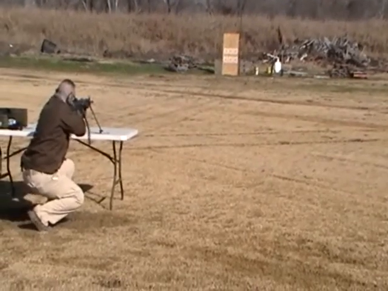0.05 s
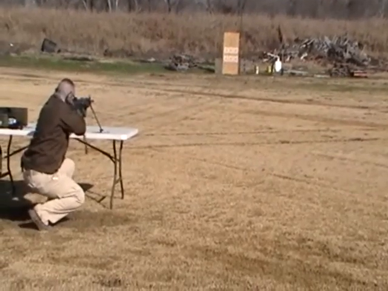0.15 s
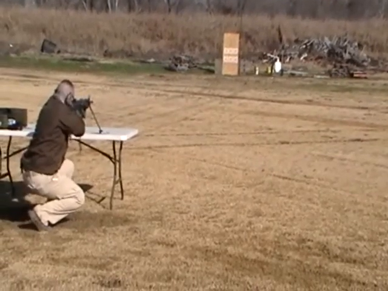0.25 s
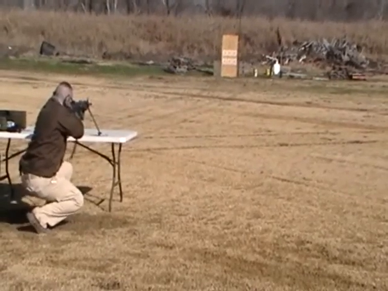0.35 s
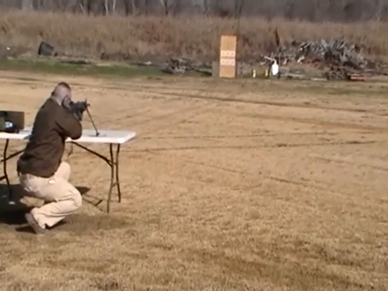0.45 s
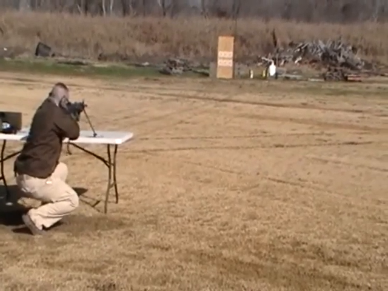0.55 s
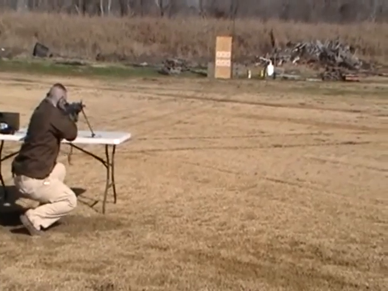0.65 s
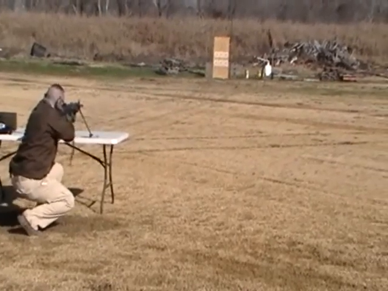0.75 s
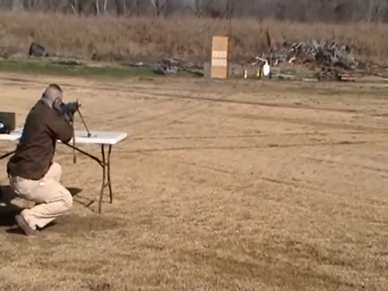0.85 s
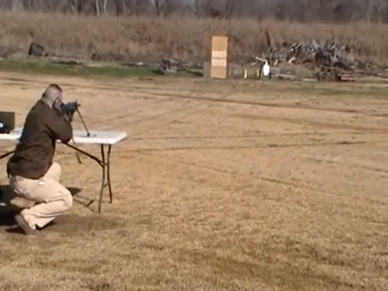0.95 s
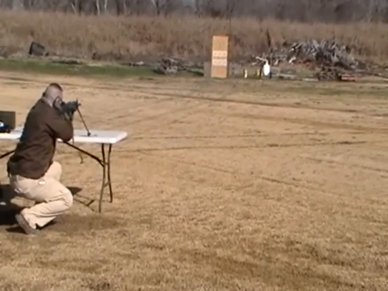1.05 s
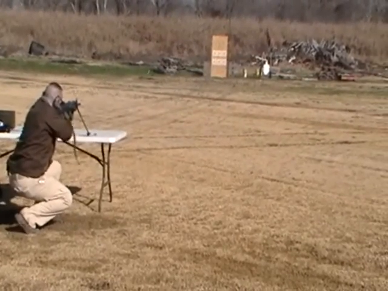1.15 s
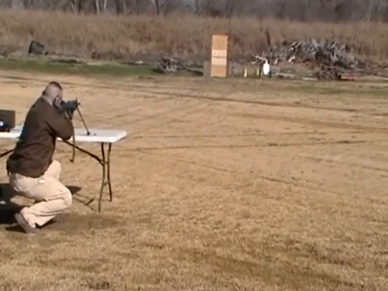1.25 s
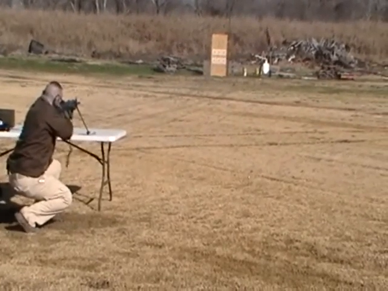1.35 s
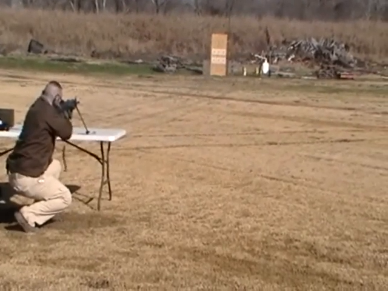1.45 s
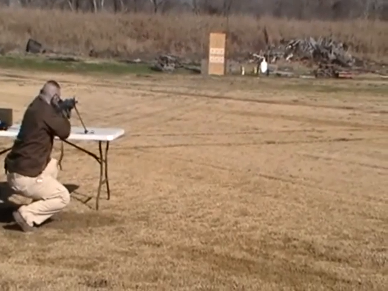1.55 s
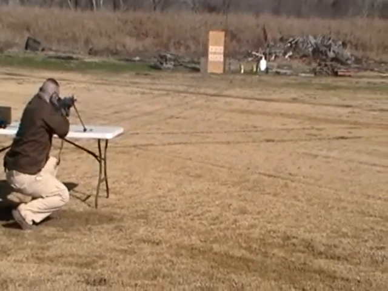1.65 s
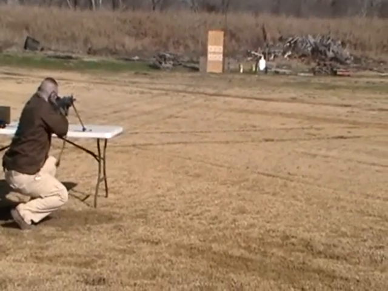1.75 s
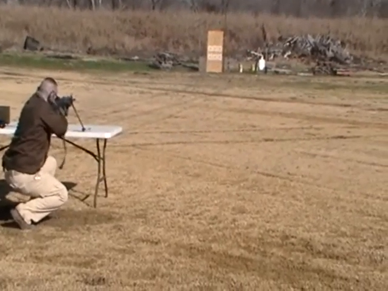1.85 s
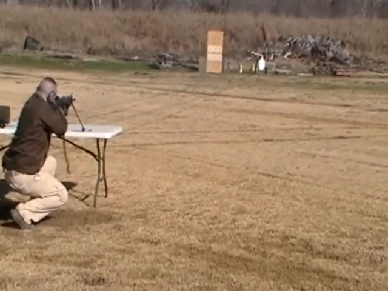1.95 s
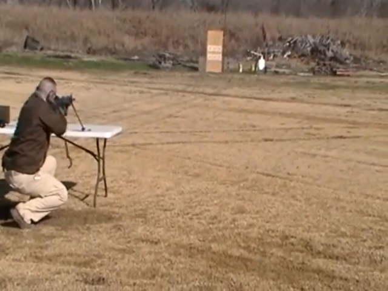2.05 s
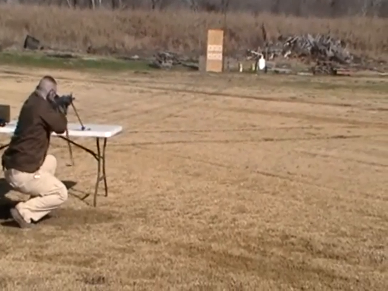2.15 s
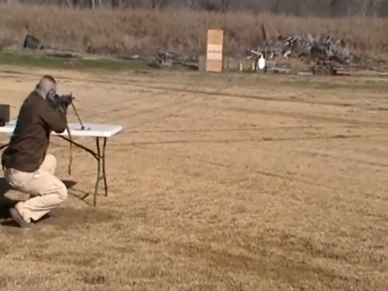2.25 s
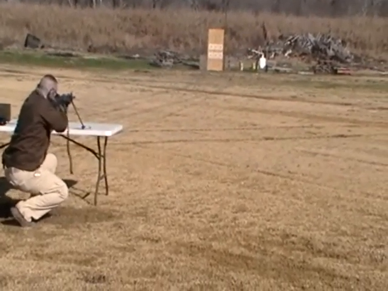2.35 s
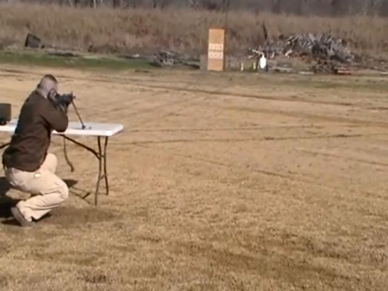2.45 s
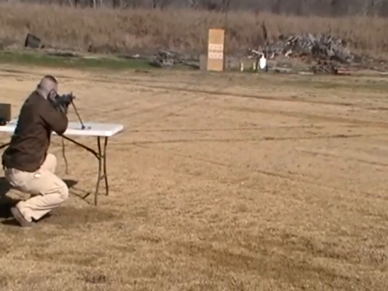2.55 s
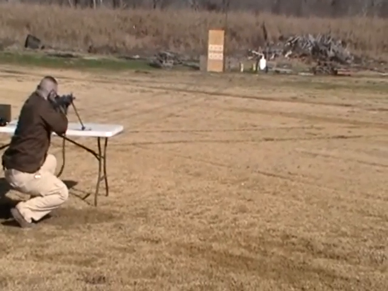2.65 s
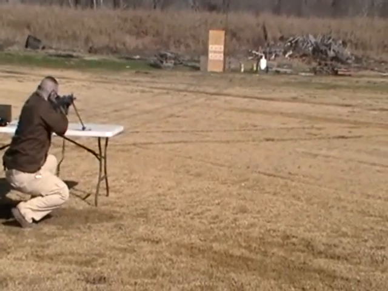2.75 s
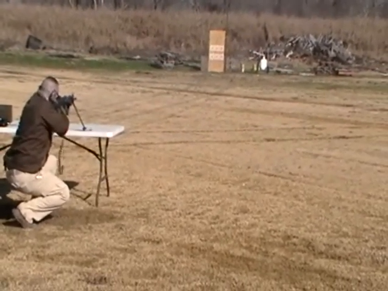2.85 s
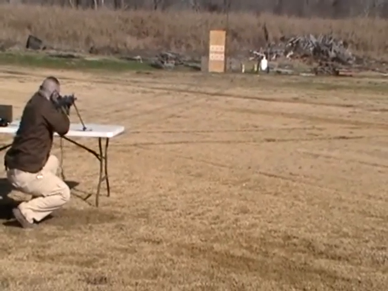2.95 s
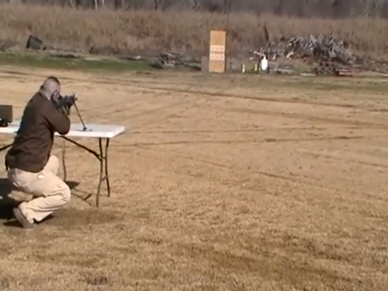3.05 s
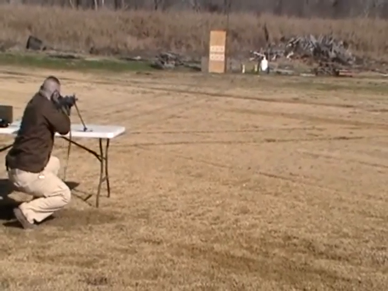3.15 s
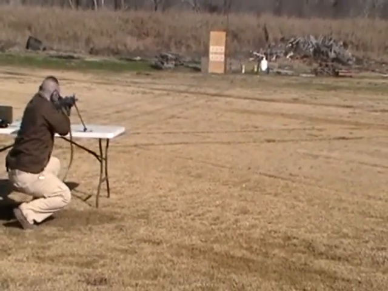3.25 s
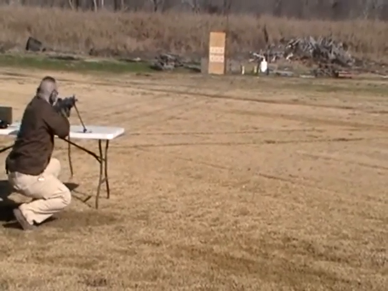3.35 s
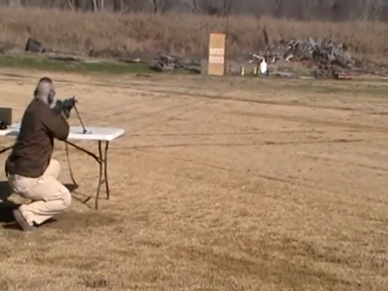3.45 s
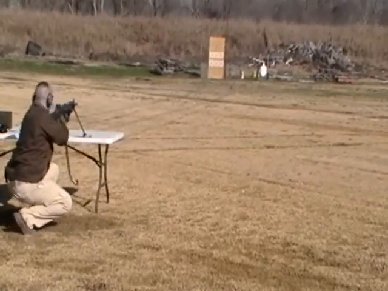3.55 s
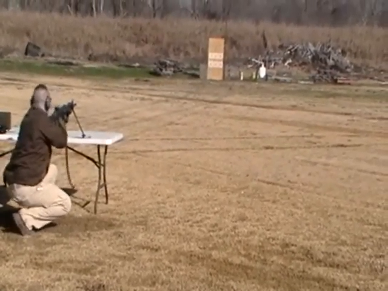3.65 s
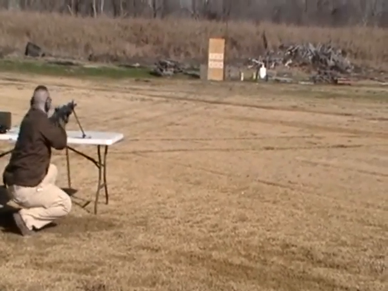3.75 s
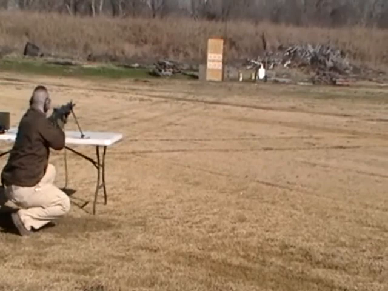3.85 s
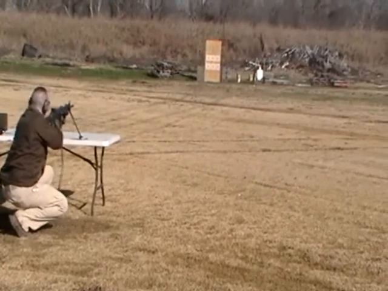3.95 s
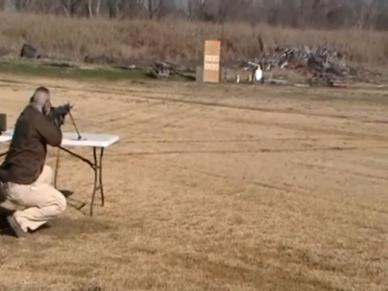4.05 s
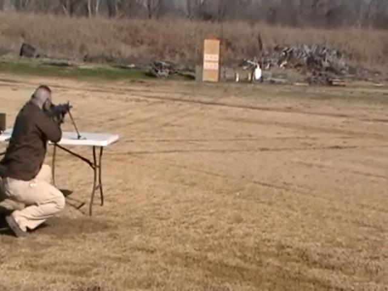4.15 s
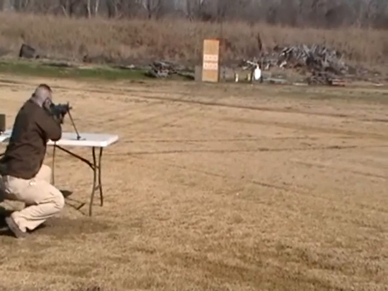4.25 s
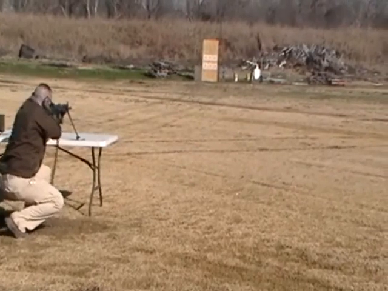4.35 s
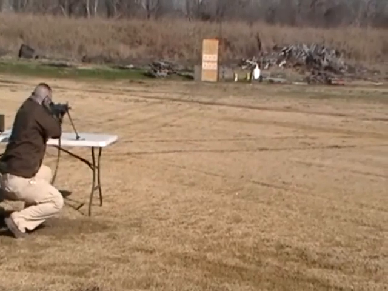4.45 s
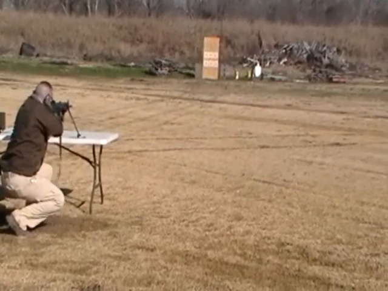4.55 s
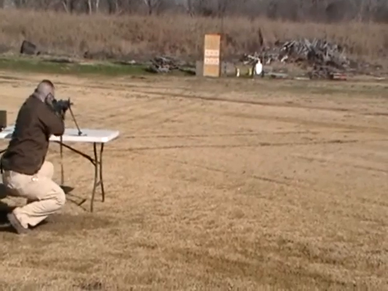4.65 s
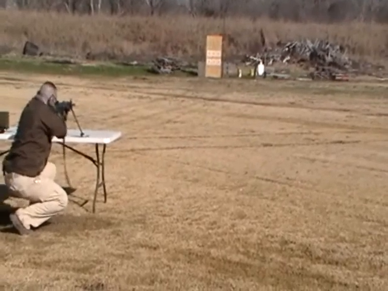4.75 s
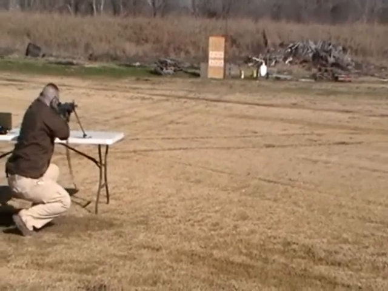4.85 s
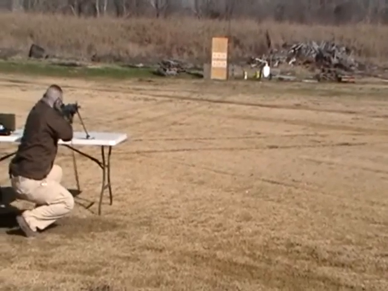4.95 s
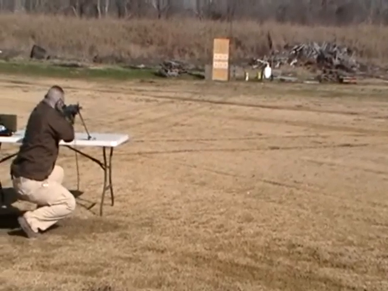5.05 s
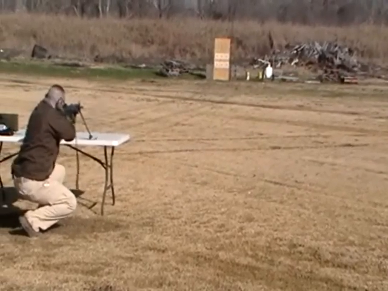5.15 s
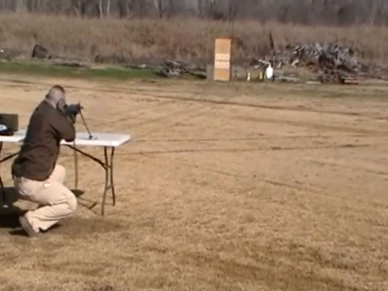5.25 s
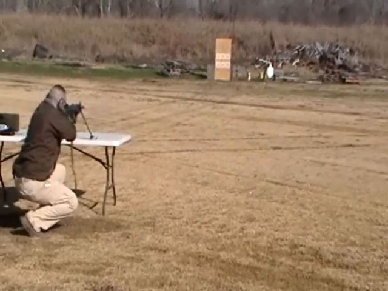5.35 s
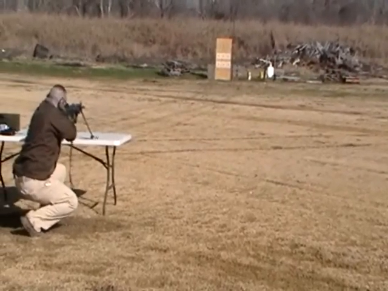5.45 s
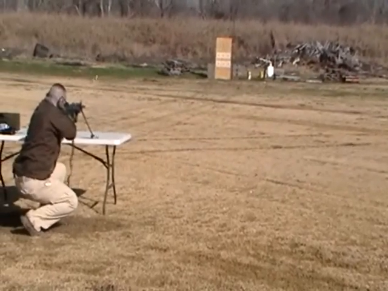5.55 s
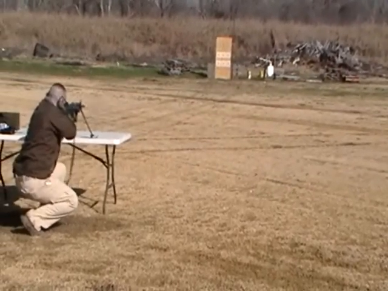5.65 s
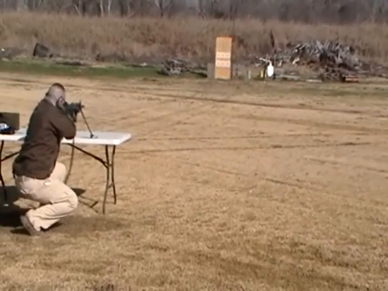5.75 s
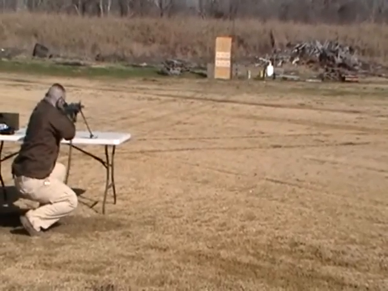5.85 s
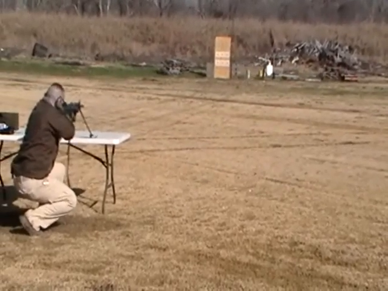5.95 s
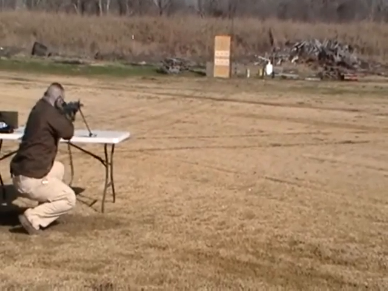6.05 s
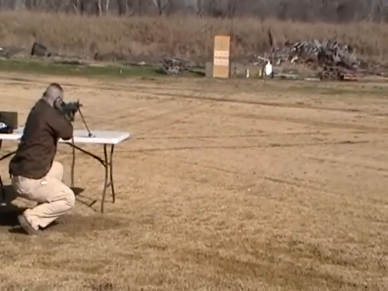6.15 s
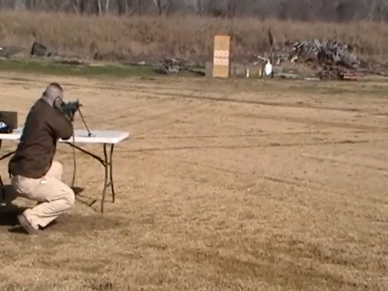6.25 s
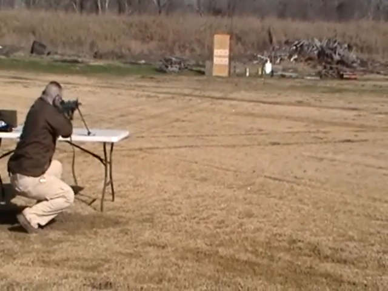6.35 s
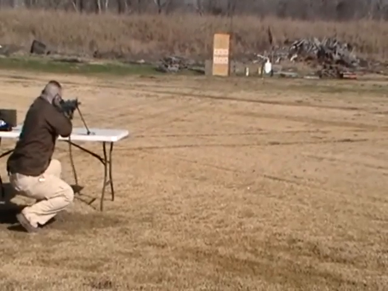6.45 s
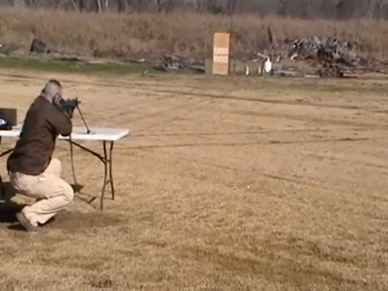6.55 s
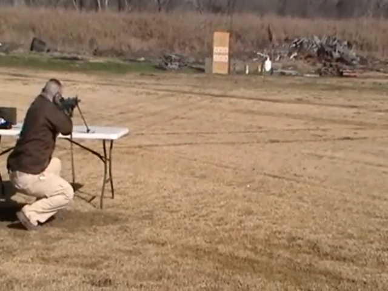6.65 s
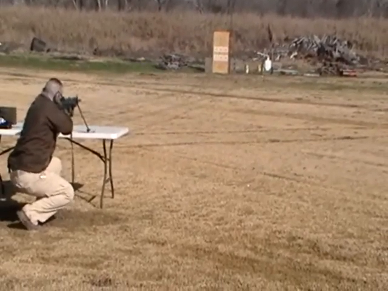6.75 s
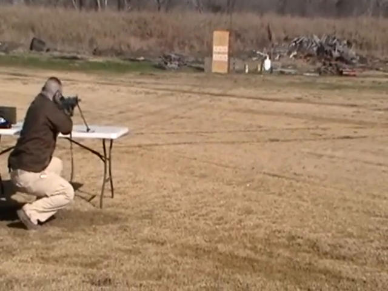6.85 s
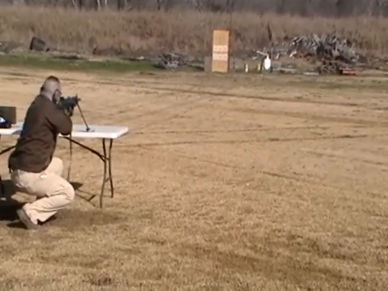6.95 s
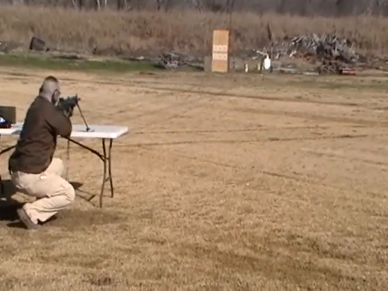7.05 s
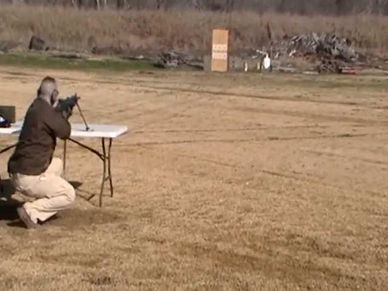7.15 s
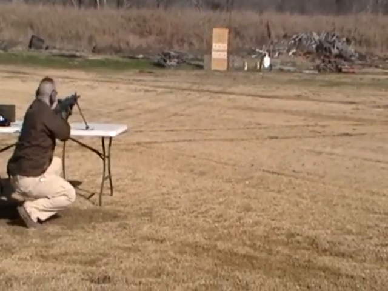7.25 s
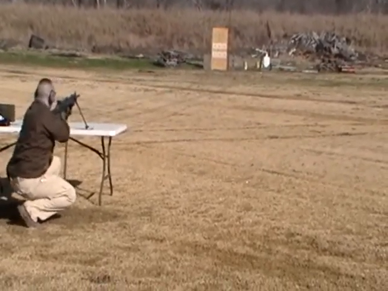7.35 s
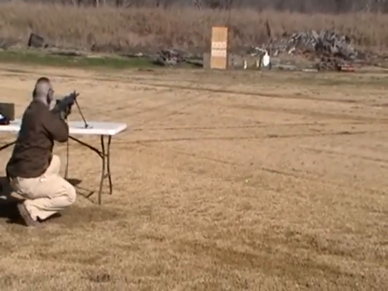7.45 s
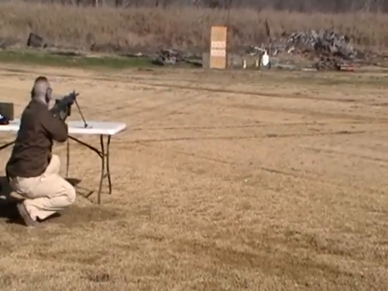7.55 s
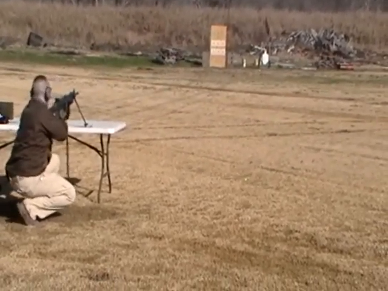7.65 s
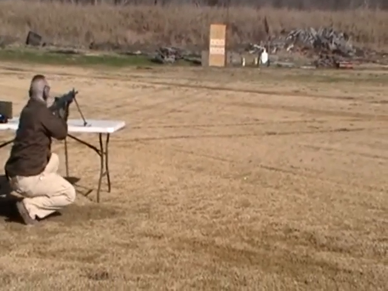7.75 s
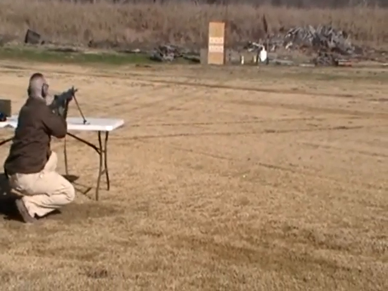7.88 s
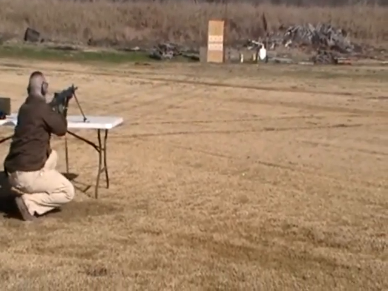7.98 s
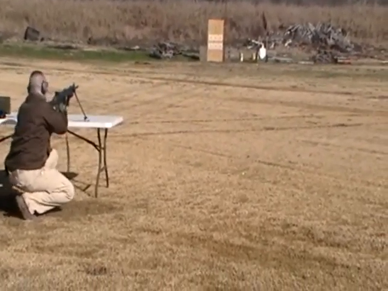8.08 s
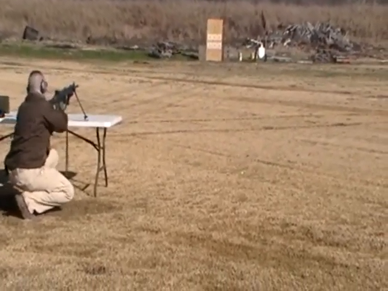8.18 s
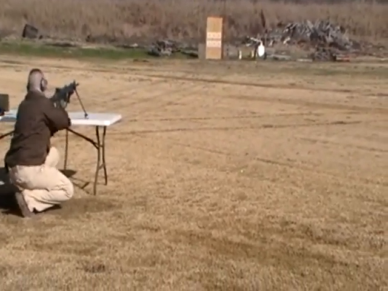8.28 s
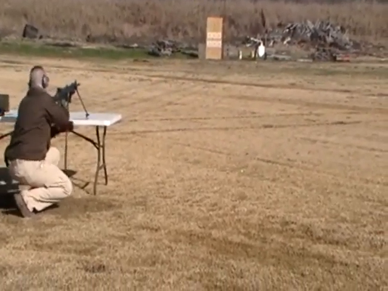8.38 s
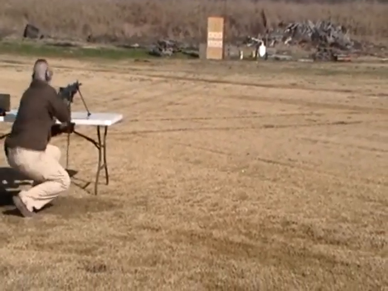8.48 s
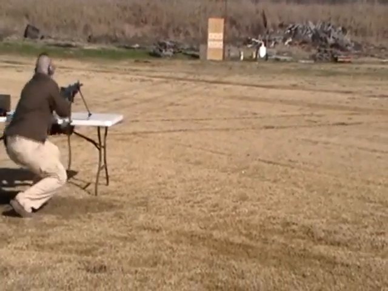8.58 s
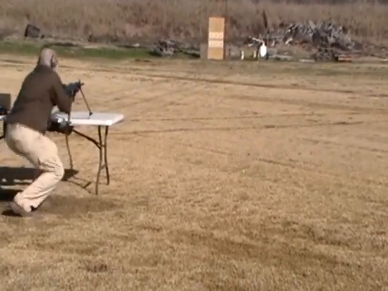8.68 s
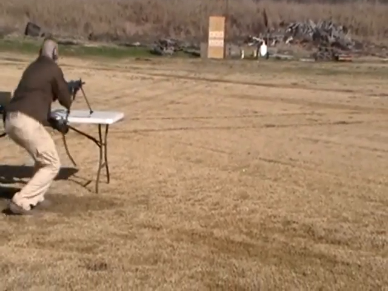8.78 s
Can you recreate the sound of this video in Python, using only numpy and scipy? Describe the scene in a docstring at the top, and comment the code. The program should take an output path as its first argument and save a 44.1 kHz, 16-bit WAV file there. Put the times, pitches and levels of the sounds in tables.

```python
"""Automatic rifle on a grass range

A rifle fires two long strings of shots, and every blast overloads the microphone. The bolt clacks,
bullets slap the earth bank, and the ground and far trees roll on. During the firing, everything is
heard again a tenth of a second later. The pauses hold birds, wind, a hum, thin whines and ticks."""
import sys
import numpy as np
from scipy import signal
from scipy.io import wavfile
from scipy.ndimage import uniform_filter1d

SR = 44100
rng = np.random.default_rng(int(sys.argv[2]) if len(sys.argv) > 2 else 0)


def inscribe(sig):
    """Save sig as 16-bit PCM at rate SR to the path in sys.argv[1].

    A 1-D sig is mono; a 2-D sig holds one channel per row.
    Samples are clipped to [-1, 1] before scaling.
    """
    pcm = np.round(np.clip(np.atleast_2d(sig).T, -1, 1) * 32767)
    wavfile.write(sys.argv[1], SR, pcm.astype(np.int16))


N = 388962
LEAD = SR  # extra samples before time zero, as the firing has already begun

# Levels in dB are relative. A decay is the time a sound takes to fall by 60 dB.
# How alike left and right are. Each row: frequency in Hz, likeness from 0 to 1.
STEREO_LIKENESS = [(30, .1), (70, .6), (180, .97), (550, .97), (1650, .965), (4970, .87), (15000, .3)]
# The wash of open air. Each row: frequency in Hz, level in dB.
AIR_WASH = [(25, -7.5), (60, -4.5), (120, 6), (250, -6), (520, -21), (900, -17), (2000, -22.5),
            (3600, -30.5), (6000, -33.5), (16000, -46)]
# The shots. Each row: start in seconds, extra delay of the bullet's slap in ms, slap level in dB.
SHOTS = [(-.009, 1.5, -9), (.165, 1.5, -2.5), (0.3319, -9.5, -12), (0.5076, 0, -7.5), (0.6927, 2, -1.5),
         (.8659, 1, 5), (1.0429, 4, 3), (1.2145, 0.5, -7), (1.3916, 3.5, 1), (1.565, -5, -21.5),
         (1.7308, -2.5, -3), (1.9244, -7.5, -8.5), (2.086, 0, -4.5), (2.275, 2, -14), (2.4453, 3.5, -7.5),
         (2.6218, -5.5, -27), (2.7949, 2, 3), (5.1623, 5, -15), (5.3745, -0.5, -2), (5.555, 2.5, 0.5),
         (5.7513, 4.5, -13), (5.9377, 4.5, 0), (6.1274, 3.5, -2), (6.31, 2, -16), (6.508, 11.5, 4)]
# The muzzle blast. Each row: frequency in Hz, level in dB, decay in seconds.
BLAST_SPECTRUM = [(60, -15, 0.064), (170, -1, 0.048), (800, 2, .09), (1800, -1, 0.065), (3240, -2.5, 0.067),
                  (8100, -6, 0.069), (13900, -18.5, 0.091)]
# The table ringing under the gun. Each row: pitch in Hz, level in dB, decay in seconds.
TABLE_RINGS = [(140, -7, 0.1), (260, -1.5, 0.18), (488.3, -7, 0.33), (771.3, 9.5, 0.075), (937, -4, 0.052),
               (1106, 2, .08), (1664, 4.5, 0.081), (2262, 11, 0.028)]
# Short noises of each shot. Each row: delay in seconds, level in dB, low and high edge in Hz,
# rise and decay in seconds. The slap's delays count from when it gets back to the listener.
STRIKER_CLICK = (-.01, -22, 1500, 12000, .0005, .05)
BOLT_CLACKS = [(0.07, -7.5, 5060, 11000, 0.0014, 0.045), (.085, -25.5, 2000, 8330, 0.0015, .03)]
FENCE_ECHOES = [(.207, -7.5, 3010, 8093, .003, 0.093), (.214, -8.5, 2000, 8950, 0.00038, .012),
                (.233, -6.5, 1500, 9000, .0005, 0.0095)]
BANK_SLAP = [(0, -7.5, 3500, 11000, 0.00087, 0.013), (.004, -1, 2157, 6500, 0.0024, 0.059),
             (.029, -3.5, 1500, 5000, .001, .02)]
# Clean echoes. Each row: delay in seconds, level in dB, width in seconds.
THUMPS = [(.16, -0.5, 0.00034), (0.211, 3, 0.00054), (.234, 4.5, 0.00025), (.287, 6, 0.00091),
          (0.389, 2, 0.0012), (0.483, -2, .0008), (0.516, -0.5, 0.00077), (0.611, -2.5, 0.00094)]
# Echoes from the ground and the trees. Each row: frequency in Hz, level in dB.
GROUND_SPECTRUM = [(40, -44), (90, -30), (150, -8), (250, 4.5), (400, -3.5), (560, -6.5), (1000, -9),
                   (2500, -13.5), (6000, -14), (15000, -23)]
TREE_SPECTRUM = [(60, -23.5), (130, -5.5), (250, 4), (550, -9.5), (900, 3.5), (1400, -2.5), (2700, 2.5),
                 (5000, 1.5), (12000, 1)]
# Air soaks up treble. Each row: frequency in Hz, base loss in dB per second (scaled for each echo).
AIR_LOSS = [(100, 2.5), (1000, 5), (3000, 13.5), (5000, 26), (8000, 34.5), (15000, 66)]
# The echoes of each string. Each row: ground in dB, trees in dB, tree treble tilt in dB per octave,
# thumps in dB.
STRING_ECHOES = [(-13.5, -16, -1, 0.5), (-13.5, -18, 1, 0.5)]
# A low hum and short bird pips. Each row: start and length in seconds, first and last Hz, level in dB.
HUM_NOTES = [(3.0, 2.5, 119.5, 117, -37.5), (8.0, 1.285, 116.5, 115, -36.5)]
BIRD_PIPS = [(4.74, .05, 4600, 4580, -66), (7.935, .04, 4830, 4860, -65)]
# Thin whines. Each row: start and time of highest pitch in seconds, that pitch in Hz, level in dB.
WHINES = [(4.05, 4.4, 2068, -52), (4.45, 4.3, 1965, -59), (4.05, 4.35, 1395, -58)]
# The tones in a whine. Each row: multiple of its pitch, level in dB.
WHINE_TONES = [(1, 0), (1.5, -11), (2, -15)]
# Wind bumps. Each row: time in seconds, level in dB.
GUSTS = [(4.05, -44), (4.55, -30.5), (4.64, -30), (8.76, -52)]
# Faint ticks. Each row: start in seconds, level in dB, frequency in Hz near the bottom of the band.
TICKS = [(4.1175, -55, 3010), (4.1954, -40, 3100), (4.2443, -42, 3500), (4.2594, -42, 3030),
         (4.3574, -42, 4160), (4.5474, -49, 4270), (4.6894, -49, 4510), (4.8663, -46, 3800),
         (5.1178, -41, 3820)]
# A bird, near and then far, one list each. Each row: time in seconds, pitch in Hz, level in dB.
BIRD_WHISTLES = [
    [(4.312, 4468, -64), (4.322, 4695, -49), (4.332, 4743, -45), (4.358, 4147, -53), (4.438, 4176, -48),
     (4.644, 4336, -52), (4.722, 4594, -53), (4.744, 4461, -54), (4.758, 4555, -72)],
    [(7.86, 4118, -72), (7.926, 4137, -64), (7.946, 4268, -68), (7.954, 4204, -64), (7.98, 4242, -69),
     (8.082, 4378, -64), (8.138, 4385, -69), (8.15, 4351, -78)],
]
# Bird chirps. Each row: start in seconds, level in dB.
BIRD_CHIRPS = [(4.52, -66), (4.585, -66), (4.647, -63), (4.712, -63), (4.92, -68), (4.994, -63),
               (5.076, -65)]
# Bullets ringing on metal. Each row: start in seconds, level in dB.
CLANKS = [(5.818, 3.5), (6.392, 3.5), (6.781, 8.5)]
# One clank: low and high edge in Hz, rise and decay in seconds.
CLANK_SHAPE = (1900, 3300, 0.0016, 0.083)
# A late rustle. Each row: time in seconds, level at 3-4 kHz in dB, treble level in dB.
RUSTLE = [(7.6, -75, -75), (8.15, -66.5, -68.5), (8.3, -64.5, -65), (8.599, -62, -64), (8.72, -70.5, -72),
          (8.82, -73, -76)]


def gain_of(db):
    """Turns decibels into a number to multiply by."""
    return 10 ** (np.asarray(db) / 20)


def look_up(table, hz, column=1):
    """Reads a table at any frequency, sliding between its rows."""
    columns = np.transpose(table)
    return np.interp(np.log(hz + 1), np.log(columns[0] + 1), columns[column])


def add(mix, start_s, sound):
    """Mixes a sound in; the mix starts LEAD samples early."""
    part = mix[..., LEAD + round(start_s * SR):][..., :sound.shape[-1]]
    part += sound[..., :part.shape[-1]]


def shape_noise(pair, db_of, size):
    """Makes two noises as alike as two microphones hear them, then colours them by db_of(Hz, seconds)."""
    overlap = size * 3 // 4
    hz, t, spectra = signal.stft(pair, SR, nperseg=size, noverlap=overlap)
    same = np.clip(look_up(STEREO_LIKENESS, hz), 0, 1)[:, None]
    mid, side = np.sqrt((1 + same) / 2) * spectra[0], np.sqrt((1 - same) / 2) * spectra[1]
    spectra = np.array([mid + side, mid - side]) * gain_of(db_of(hz[:, None], t))
    return signal.istft(spectra, SR, nperseg=size, noverlap=overlap)[1][:, :pair.shape[1]]


def noise_band(low_hz, high_hz, size, width=.083):
    """Stereo noise between two frequencies, at a strength of 1."""
    mid, side = rng.standard_normal((2, size))
    edges = signal.butter(2, [low_hz, high_hz], "band", fs=SR, output="sos")
    noise = signal.sosfilt(edges, [mid + width * side, mid - width * side])
    return noise / noise.std()


def puff(db, low_hz, high_hz, rise_s, decay_s):
    """A short burst of noise: a click, clack or slap."""
    noise = noise_band(low_hz, high_hz, size=4000)
    t = np.arange(noise.shape[1]) / SR
    return noise * gain_of(db - 60 * t / decay_s) * np.minimum(t / rise_s, 1)


def tone(t, hz, db, fade_s, waver=.002):
    """A slightly unsteady pure tone with soft ends. Returns its start time and its sound."""
    knots_s = np.arange(300) / 100
    drift, flutter_db = (np.interp(t - t[0], knots_s, row) for row in rng.standard_normal((2, 300)))
    turns = np.cumsum(hz * (1 + waver * drift)) / SR
    ends = np.minimum(np.minimum(t - t[0], t[-1] - t) / fade_s, 1)
    return t[0], np.sqrt(2) * gain_of(db + flutter_db) * np.sin(2 * np.pi * turns) * ends


def open_air(db=-45.5):
    """A quiet, low wash of noise that gently swells and sinks."""
    swell = uniform_filter1d(rng.standard_normal(N + LEAD), size=4096) * 64
    wash = shape_noise(rng.standard_normal((2, N + LEAD)), lambda hz, s: look_up(AIR_WASH, hz), size=1024)
    return wash * gain_of(db + 1.5 * swell) / wash.std()


def gunfire(cycle_s=.176, early_shots=4, second_string_s=5, slap_return_s=.257, alike=.7):
    """Each shot sets off the striker, the blast, the bolt, the echoes and the bullet's slap."""
    mix = np.zeros((2, N + LEAD))
    shared_noise = rng.standard_normal((2, 8000))  # makes the blasts partly alike
    echoes = [[range_echo(*row) for _ in range(2)] for row in STRING_ECHOES]  # two take turns
    first_s, *first_slap = SHOTS[0]
    early = [(first_s - k * cycle_s, *first_slap) for k in range(early_shots, 0, -1)]
    for k, (start, later_ms, slap_db) in enumerate(early + SHOTS):
        scatter = alike * shared_noise + np.sqrt(1 - alike ** 2) * rng.standard_normal(shared_noise.shape)
        add(mix, start, muzzle_blast(scatter))
        add(mix, start, echoes[start > second_string_s][k % 2])
        for delay, *shape in [STRIKER_CLICK] + BOLT_CLACKS + FENCE_ECHOES:
            add(mix, start + delay, puff(*shape))
        slap_s = start + slap_return_s + later_ms / 1000
        for delay, *shape in BANK_SLAP:
            add(mix, slap_s + delay, gain_of(slap_db) * puff(*shape))
    return mix


def muzzle_blast(scatter):
    """The muzzle's pressure wave scatters into fast-dying noise, and the table under the gun rings."""
    def colour_db(hz, s):
        return 24 + look_up(BLAST_SPECTRUM, hz) - 60 * s / look_up(BLAST_SPECTRUM, hz, column=2)

    t = np.arange(scatter.shape[1]) / SR
    wave = shape_noise(scatter, colour_db, size=128)
    ring = sum(gain_of(db - 60 * t / decay_s) * np.sin(2 * np.pi * hz * rng.uniform(.985, 1.015) * t)
               for hz, db, decay_s in TABLE_RINGS)
    return (wave + ring) * np.minimum(t / .0007, 1)


def range_echo(ground_db, trees_db, tilt_db, thumps_db, trees_s=.6):
    """Ground and trees throw a shot back as many uneven echoes, duller the farther they travel."""
    def colour_db(hz, s):
        loss_db = s * look_up(AIR_LOSS, hz)
        sag_db = 17 * np.minimum(s, trees_s)  # the ground roll sinks until the trees answer
        ground = look_up(GROUND_SPECTRUM, hz) + ground_db - sag_db - 1.27 * loss_db
        wait_s = np.maximum(trees_s - s, 0)
        swell_db = -12 * np.minimum(wait_s / .059, 1) - 31.5 * wait_s  # nearer brush leads in
        treble_db = tilt_db * np.log2(1 + hz / 1000)
        trees = look_up(TREE_SPECTRUM, hz) + trees_db + treble_db + swell_db - 1.432 * loss_db
        return 20 * np.log10(np.hypot(gain_of(ground), gain_of(trees)))

    t = np.arange(SR * 5 // 2) / SR
    scatter = rng.standard_normal((2, len(t)))
    scatter *= gain_of(30.6 * uniform_filter1d(rng.standard_normal(len(t)), size=100))
    scatter /= scatter.std()
    late_s = np.maximum(t - trees_s, 0)
    fall = gain_of(-28 * late_s) + gain_of(-25.5 - 2.5 * late_s)  # a quick fade plus a faint far tail
    roll = gain_of(18) * shape_noise(scatter, colour_db, size=512) * fall * np.minimum(t / .012, 1)
    for delay, db, width_s in THUMPS:
        offset = (t[:SR] - delay) / width_s
        thump = (1 - offset ** 2) * np.exp(-offset ** 2 / 2)  # a push between two pulls
        roll[:, :SR] += gain_of(db + thumps_db) * thump
    return roll


def glide(start, length_s, first_hz, last_hz, db, fade_s=.0072, waver=.002):
    """A tone sliding between two pitches: long and low for the hum, short and high for a bird's pip."""
    t = np.arange(start, start + length_s, 1 / SR)
    return tone(t, np.linspace(first_hz, last_hz, len(t)), db, fade_s, waver)


def whine(start, top_s, top_hz, db, end_s=5.3, fade_db_per_s=11):
    """A thin whine that arches over in pitch and fades, with two weak overtones."""
    t = np.arange(start, end_s, 1 / SR)
    hz = top_hz * (1 - .16 * (t - top_s) ** 2)
    level_db = db - fade_db_per_s * (t - start)
    return start, sum(tone(t, multiple * hz, level_db + tone_db, fade_s=.15, waver=.007)[1]
                      for multiple, tone_db in WHINE_TONES)


def wind_bump(time_s, db):
    """Wind knocks on the microphone with a soft, deep bump."""
    return time_s - .04, gain_of(db) * noise_band(25, 90, size=4000, width=.8) * np.hanning(4000)


def tick(start, db, hz):
    """A tiny, bright snap of noise."""
    return start, puff(db - 4.5, hz * .9, hz * 2.7, rise_s=.0003, decay_s=.014)


def bird_whistle(rows):
    """A bird holds one long, wandering note."""
    times, hz, db = np.transpose(rows)
    t = np.arange(times[0], times[-1], 1 / SR)
    return tone(t, np.interp(t, times, hz), np.interp(t, times, db), fade_s=.006)


def bird_chirp(start, db, length_s=.021):
    """A quick arch in pitch, loudest at the top."""
    progress = np.linspace(0, 1, round(length_s * SR))
    arch = 1 - ((progress - .62) / .62) ** 2
    return tone(start + progress * length_s, 5200 + 850 * arch, db - 7.5 + 5 * arch, fade_s=.006)


def metal_clank(start, db):
    """A bullet hits metal, which rings briefly in a narrow band."""
    return start, puff(db, *CLANK_SHAPE)


def rustle():
    """Two bands of faint hiss swell and fade."""
    times, low_db, high_db = np.transpose(RUSTLE)
    t = np.arange(times[0], times[-1], 1 / SR)
    low = gain_of(np.interp(t, times, low_db)) * noise_band(3180, 3810, SR * 2)[:, :len(t)]
    high = gain_of(np.interp(t, times, high_db)) * noise_band(4500, 11500, SR * 2, width=.94)[:, :len(t)]
    return times[0], low + high


def overload(mix, threshold_db=-15.5, response_s=.22):
    """The microphone's automatic volume sinks under loud sound, and the peaks are softly squashed."""
    memory = np.exp(-1 / (response_s * SR))
    power = signal.lfilter([1 - memory], [1, -memory], np.minimum(mix ** 2, 1).mean(0))
    cut_db = .9 * np.maximum(10 * np.log10(power + 1e-12) - threshold_db, 0)
    return .74 * np.tanh(mix / gain_of(cut_db) / .78)


def repeat(heard, delay_s=.1, db=-.17):
    """Drops the lead-in and adds a delayed copy during two set spans that go with the firing."""
    t = np.arange(N) / SR
    on = (t < 4.12) | ((t >= 5.25) & (t < 7.59))
    delayed = heard[:, LEAD - round(delay_s * SR):][:, :N]
    return heard[:, LEAD:] + gain_of(db) * on * delayed


def scene():
    """Mixes the rifle with the quiet sounds of the field, then overloads and repeats the result."""
    mix = gunfire()
    for row in CLANKS:
        add(mix, *metal_clank(*row))
    mix += open_air()
    for row in GUSTS:
        add(mix, *wind_bump(*row))
    add(mix, *rustle())
    for rows in BIRD_WHISTLES:
        add(mix, *bird_whistle(rows))
    for row in HUM_NOTES:
        add(mix, *glide(*row, fade_s=.34, waver=.014))
    for rows, voice in (BIRD_PIPS, glide), (WHINES, whine), (BIRD_CHIRPS, bird_chirp), (TICKS, tick):
        for row in rows:
            add(mix, *voice(*row))
    return repeat(overload(mix))


def record(dry, low_hz=62, high_hz=16100):
    """Cuts the deep bass, clips the peaks and removes the highest treble."""
    balanced = dry * gain_of([[.2], [-.2]])  # the left side is a touch louder
    bass_cut = signal.butter(2, low_hz, "high", fs=SR, output="sos")
    clipped = np.clip(signal.sosfilt(bass_cut, balanced), -1, 1)
    treble_cut = signal.firwin(511, high_hz, window=("kaiser", 9), fs=SR)
    return np.clip(signal.oaconvolve(clipped, treble_cut[None], "same"), -1, 1)


dry = scene()
out = record(dry)
inscribe(out)
```